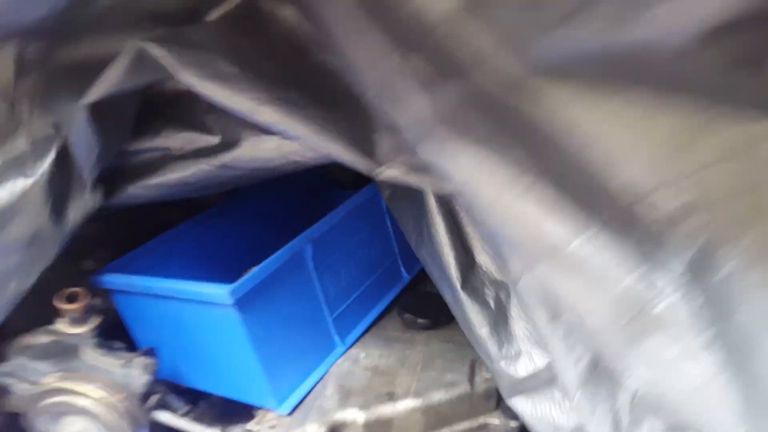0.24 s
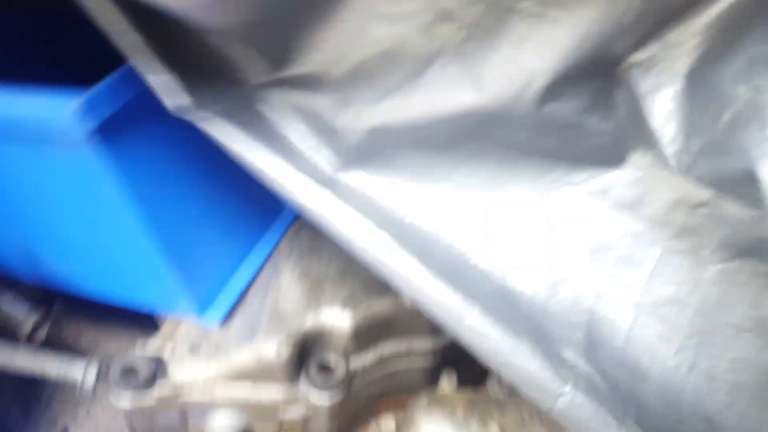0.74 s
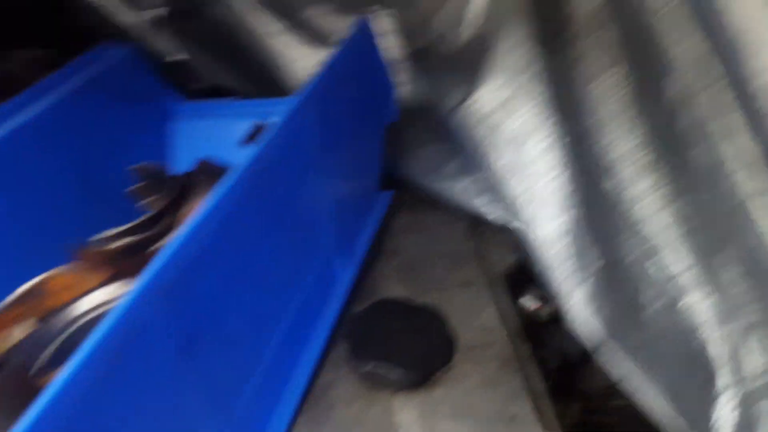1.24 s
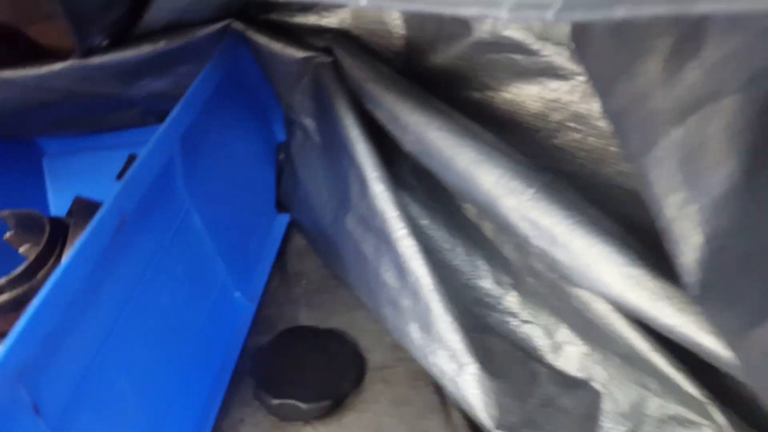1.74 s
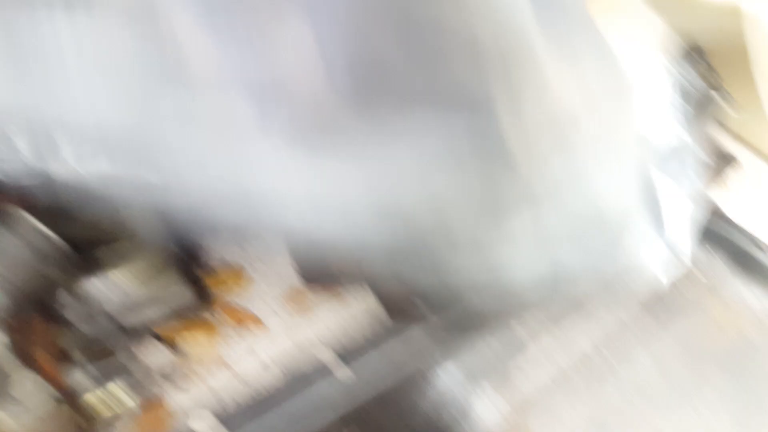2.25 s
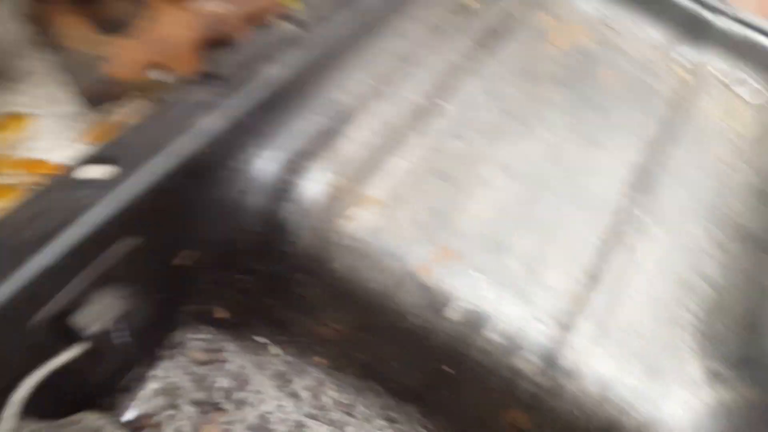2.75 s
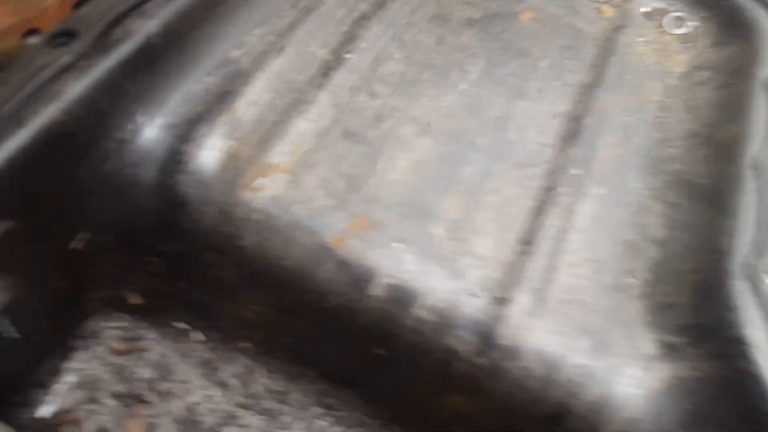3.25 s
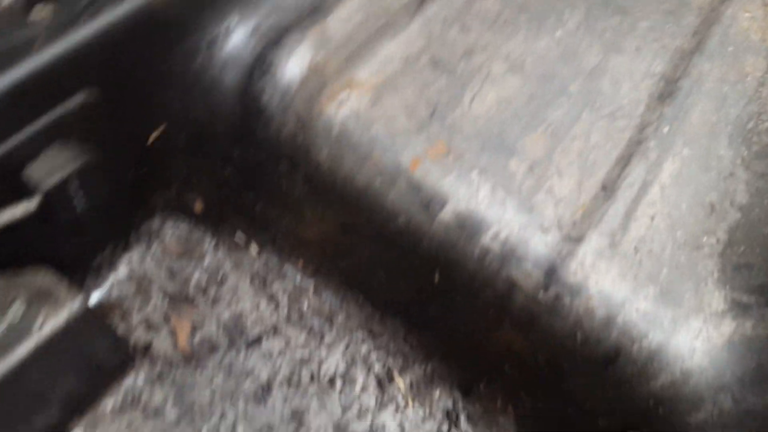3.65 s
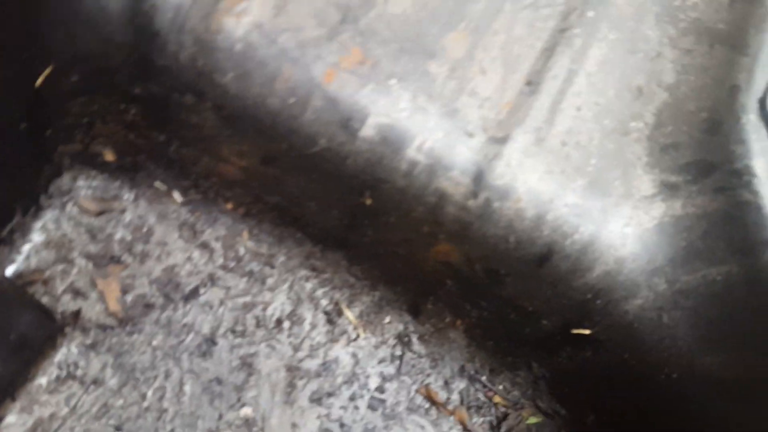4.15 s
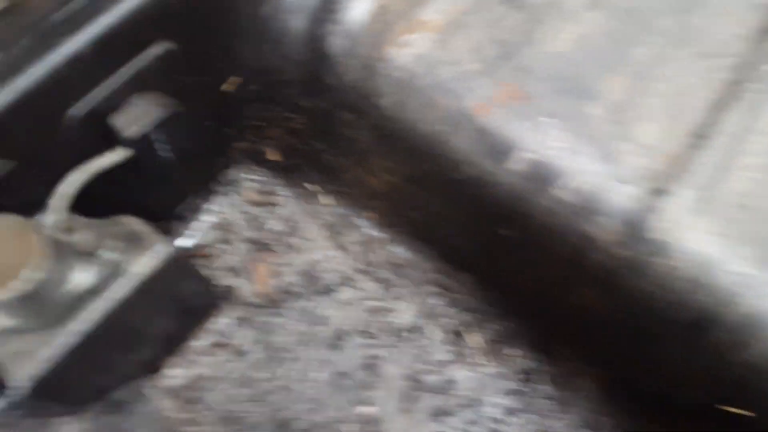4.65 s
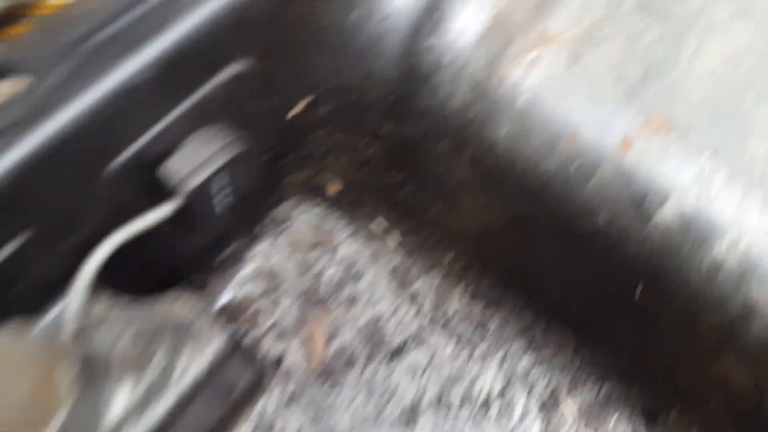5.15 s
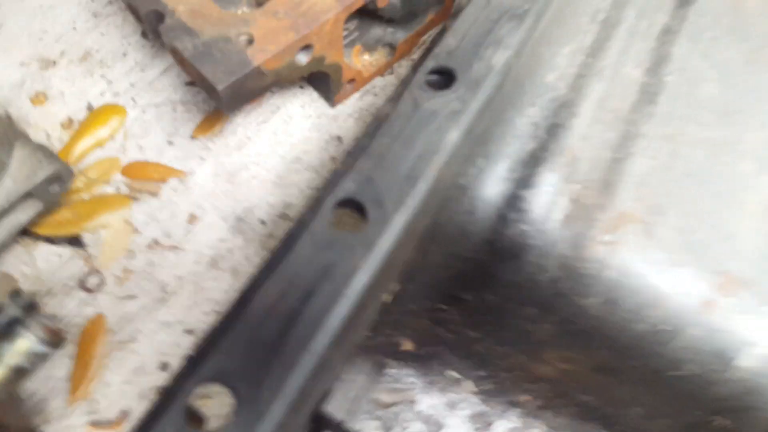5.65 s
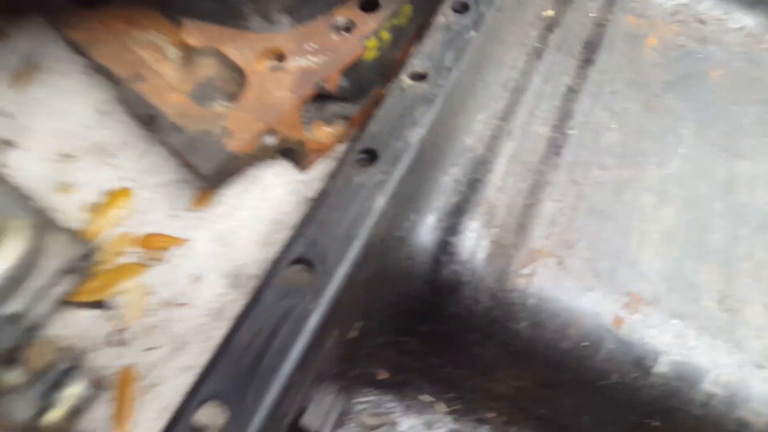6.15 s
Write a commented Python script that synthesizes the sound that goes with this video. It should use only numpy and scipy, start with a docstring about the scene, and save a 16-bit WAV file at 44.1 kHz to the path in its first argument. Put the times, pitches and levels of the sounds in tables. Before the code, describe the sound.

A stiff woven plastic tarp is pulled about in many quick tugs, very close to two microphones. Each tug is a dense burst of crackling folds and sliding rustle, with sharp creases snapping over and a low puff of air. A few slack folds flop with a dull hollow thump, the strongest a little after five seconds. Brief near-quiet gaps separate pulls. The room tail is short, and the right side is brighter.

```python
"""In a room with a short tail, a woven plastic tarp is dragged off a pile of engine parts in many short pulls,
close to a pair of microphones. Bursts of clicks ring resonant folds: the creases buckling. Filtered noise is the
sheet sliding on itself, and low noise the air it billows. Single creases snap over as three quick jumps through
a resonance, and a few times a slack fold flops with a hollow thump, a short decaying sine."""
import sys
import numpy as np
from scipy import signal
from scipy.fft import rfft, irfft, next_fast_len
from scipy.io import wavfile

SR = 44100
rng = np.random.default_rng(int(sys.argv[2]) if len(sys.argv) > 2 else 0)


def master_out(mix):
    """Clip the mix to full scale and print it as 16-bit PCM to the path in sys.argv[1]."""
    frames = np.transpose(np.atleast_2d(mix))
    ceiling = np.clip(frames, -1, 1)
    pcm = np.round(ceiling * 32767).astype(np.int16)
    wavfile.write(sys.argv[1], SR, pcm)


N = 281799

# Large creases snapping over.
# Each row: start in seconds, rms level of the first 6 ms in dB, pitch in Hz, decay time (T60) of the sheet in seconds.
LARGE_SNAPS = [(0.1764, -34, 4960, 0.097), (0.2356, -23, 700, 0.0096), (0.2605, -23, 2480, 0.018),
               (0.2799, -17.5, 1380, 0.015), (0.323, -24, 3200, 0.073), (0.3775, -23, 3490, 0.034),
               (0.4453, -19.5, 1260, 0.024), (0.5957, -30, 4530, 0.017), (0.7138, -17, 1690, 0.012),
               (0.829, -18.5, 2240, 0.03), (1.373, -19, 1590, 0.17), (1.9866, -23.5, 1920, 0.039),
               (2.1157, -31, 1120, 0.051), (2.199, -32, 1450, 0.036), (2.2966, -25, 1330, 0.028),
               (2.3167, -23.5, 3250, 0.03), (2.3406, -20, 2680, 0.011), (2.4451, -23.5, 1830, 0.027),
               (2.511, -29, 1300, 0.041), (2.7006, -20.5, 1900, 0.18), (2.9046, -21, 2480, 0.024),
               (3.1758, -25.5, 2240, 0.052), (3.2336, -29, 1080, 0.11), (3.4849, -43, 720, 0.083),
               (3.5936, -42, 1530, 0.076), (3.685, -20, 1050, 0.024), (3.7052, -21, 2280, 0.088),
               (3.9202, -18.5, 960, 0.013), (3.9979, -19.5, 2000, 0.029), (4.0951, -20.5, 980, 0.015),
               (4.176, -22.5, 3870, 0.02), (4.2228, -21.5, 2120, 0.031), (4.2746, -23, 2350, 0.047),
               (4.51, -25.5, 3270, 0.039), (4.5447, -32, 1930, 0.051), (4.63, -38, 1460, 0.083),
               (4.7262, -19.5, 2800, 0.052), (5.261, -20.5, 2340, 0.022), (6.3202, -30.5, 3770, 0.015)]
# The pulls of the hands.
# Each row: start in seconds, length in seconds, level of the broad folds at mid-pull in dB, swell from start to
# end in dB, then, relative to the folds: small creases in dB, sizzle of the weave in dB, billowing air in dB.
HAND_PULLS = [(-.02, 0.091, -41.5, 6, 3, -7, -7.5), (.148, 0.056, -32, -1, -4, -13, 4.5),
              (.215, 0.33, -25, 2.5, -3, -22, -8.5), (.565, 0.21, -23.5, 2.5, 0.5, -18.5, -7),
              (.82, 0.23, -20.5, 3.5, -1, -21.5, -7.5), (1.064, .12, -21.5, -7.5, -1, -21, -10),
              (1.169, 0.18, -21, -11.5, -1.5, -19, -8), (1.35, 0.34, -21, 3.5, -1.5, -22, -8),
              (1.605, 0.094, -20.5, 6.5, -15.5, -34, -28), (1.798, 0.21, -30, 4, -3, -15.5, -10.5),
              (2.09, .14, -40, 2, -1, -15.5, 3), (2.283, 0.068, -20.5, -23, -2.5, -23, -7),
              (2.339, 0.22, -31, -5.5, -1.5, -16, -5.5), (2.541, 0.22, -26.5, -2, -3, -19.5, -3),
              (2.83, 0.11, -30.5, -3, -1.5, -19, -6), (2.952, 0.15, -23.5, 3, -2, -18.5, -11),
              (3.16, 0.21, -38.5, -12, -3, -22, -8), (3.549, .07, -32.5, 16, -0.5, -11.5, -3.5),
              (3.668, .26, -24.5, 0, 2, -15, -5), (3.932, 0.34, -26.5, -2.5, -3.5, -22.5, -6),
              (4.285, .16, -37, 5, 1.5, -13.5, -2), (4.46, 0.086, -36.5, -8, -4.5, -24, -5),
              (4.628, .12, -27, 6.5, 1.5, -12.5, -1), (4.75, 0.15, -28, -5, -0.5, -13.5, -7.5),
              (4.92, 0.24, -29, 0.5, -1, -18.5, -6.5), (5.139, 0.44, -23.5, -4.5, 0, -21, -8),
              (5.601, .2, -26, 8.5, 1, -19, -6), (5.859, .17, -25.5, 12.5, 0.5, -17, -7.5),
              (6.114, .2, -34, 1, -2.5, -19, -8)]
RIGHT_LATE_S, MIC_SPACING_S = 0.00042, 0.00037  # lag of the right for sound from the left; travel between the mics


def from_db(db):
    """Decibels to gain."""
    return 10 ** (np.asarray(db) / 20)


def rms_one(x):
    """Scale so that the mean of the channels has rms 1."""
    return x / np.sqrt(np.mean(np.atleast_2d(x).mean(0) ** 2) + 1e-20)


def in_time(rows):
    """The columns of a curve at every sample."""
    s, *columns = np.transpose(rows)
    return [np.interp(np.arange(N) / SR, s, c) for c in columns]


def add(out, s, sound):
    """Mix a sound in at time s."""
    start = max(round(s * SR), 0)
    out[:, start:start + sound.shape[-1]] += sound[..., :max(N - start, 0)]


def drift(rate_hz):
    """Slow random drift of rms 1: noise through a double low-pass, worked out every 20 samples."""
    r = np.exp(-40 * np.pi * rate_hz / SR)
    noise = rng.standard_normal(N // 20 + 2002)
    slow = signal.lfilter([1], [1, -2 * r, r * r], noise)[2000:]  # drop the filter's run-in
    return np.interp(np.arange(N) / 20, np.arange(len(slow)), rms_one(slow))


def coloured(x, spectrum):
    """Minimum-phase filter through (Hz, dB) points: nothing sounds early."""
    size = 2 * next_fast_len(x.shape[-1] // 2 + SR // 20, real=True)
    hz, db = np.transpose(spectrum)
    log_f = np.log(np.fft.rfftfreq(size, 1 / SR) + 1)
    log_gain = np.log(from_db(np.interp(log_f, np.log(hz), db)))
    cepstrum = irfft(log_gain)[:size // 2]
    cepstrum[1:] *= 2  # fold the cepstrum onto positive time
    return irfft(rfft(x, size) * np.exp(rfft(cepstrum, size)))[..., :x.shape[-1]]


def stereo_noise(size, direct):
    """White noise at two spaced mics: a direct share of the treble comes from the left, the rest from all around."""
    padded = 2 * next_fast_len(size // 2 + 1)
    f = np.fft.rfftfreq(padded, 1 / SR)
    direct = np.clip(direct, 0, .95) * f / (f + 1000)
    from_left = direct * np.exp(-2j * np.pi * f * RIGHT_LATE_S)
    all_around = (1 - direct) * np.sinc(2 * f * MIC_SPACING_S)
    alike = from_left + all_around
    left, other = rfft(rng.standard_normal((2, padded)))
    right = alike * left + np.sqrt(np.maximum(1 - abs(alike) ** 2, 0)) * other
    return irfft([left, right])[:, :size]


def pulled(colour_db, release_db_per_s, rest_db):
    """Level of one layer in dB: every pull takes up the slack, swells or eases, and dies away when the hand stops."""
    attack_s = 0.055
    t = np.arange(0, N, 40) / SR
    power = from_db(2 * rest_db)
    for (start, length, level_db, swell_db, *_), own_db in zip(HAND_PULLS, colour_db):
        since = t - start
        held_db = level_db + own_db + swell_db * (np.clip(since / length, 0, 1) - .5)
        fallen_db = release_db_per_s * np.maximum(since - length, 0)
        gain = np.clip(since / attack_s, 0, 1) * from_db(held_db - fallen_db)
        power = power + gain ** 2
    return np.interp(np.arange(N) / SR, t, 10 * np.log10(power))


def buckling(effort_db, bursts):
    """Clicks of very unequal size; they come faster under a hard pull and in bursts."""
    hurry_db = 0.23 * (effort_db + 28.5)
    per_s = 1500 * from_db(hurry_db + 2.0 * bursts)
    sizes = from_db(4.0 * np.minimum(rng.exponential(1, N), 3.8)) * rng.choice([-1, 1], N)
    happens = rng.random(N) < per_s / SR
    return sizes * happens * from_db(-hurry_db / 2)  # under a harder pull each is smaller


def dying(power, t60):
    """Energy lingers and dies away; its sum is kept."""
    keep = from_db(-120 / (t60 * SR))  # power falls by 60 dB in t60
    return signal.lfilter([1 - keep], [1, -keep], power + 1e-18)


def fold(clicks, noise, hz, width, sheet_db, sheet_t60):
    """Clicks and their scatter through sheet and room, shaped by the resonance of one fold."""
    room_t60_s, room_db = .22, -7
    power = clicks ** 2
    in_sheet = from_db(2 * sheet_db) * dying(power, sheet_t60)
    in_room = from_db(2 * room_db) * dying(power, room_t60_s)
    sound = noise * np.sqrt(in_sheet + in_room)
    # broad folds lie ahead, small creases to the left
    leftward = min(hz / 2300, 1) * (1 + .2 * rng.standard_normal())
    sound += [clicks, np.roll(clicks, round(leftward * RIGHT_LATE_S * SR))]
    r, w = np.exp(-np.pi * width * hz / SR), 2 * np.pi * hz / SR  # width: bandwidth over pitch
    return signal.lfilter((1 - r * r) / 2 * np.array([1, 0, -1]), [1, -2 * r * np.cos(w), r * r], sound)


def crinkle(clicks, sliding, spectrum, slide_db, width, sheet_db, count):
    """Clicks dealt to folds that tighten and slacken, over the hiss of the sheet sliding on itself; rms 1."""
    # The fold that rings most, as the free part of the sheet changes size.
    # Each row: time in seconds, pitch in Hz.
    main_fold = [(0, 515), (2.0, 445), (2.5, 650), (3.1, 550), (3.7, 810), (4.3, 890), (4.9, 784),
                 (6.39, 580)]
    main_fold_db, sheet_t60_s = 4, .035
    dealt, scatter, rings = rng.integers(0, count, N), stereo_noise(N, direct=0.23), 0
    main_hz, = in_time(main_fold)
    for k, hz in enumerate(np.geomspace(spectrum[1][0], spectrum[-2][0], count)):
        near_main = np.exp(-10 * np.log2(hz / main_hz) ** 2)
        taut = from_db(3.0 * drift(26) + main_fold_db * near_main)
        own_clicks = clicks * taut * (dealt == k)
        own_scatter = np.roll(scatter, k * SR // 10, axis=1)  # a different stretch of noise for each fold
        rings = rings + fold(own_clicks, own_scatter, hz, width, sheet_db, sheet_t60_s)
    ringing = rms_one(coloured(rings, spectrum))
    hiss = rms_one(coloured(sliding, spectrum))
    return rms_one(ringing + from_db(slide_db) * hiss)


def rustle(folds_db, creases_db, weave_db):
    """The same buckles sound in broad folds, small creases and the weave."""
    # Tone of each of the three as it reaches the microphones; the weave dips deeply near 9.6 kHz. Each row:
    # frequency in Hz, filter gain in dB.
    fold_tone = [(160, -43.5), (300, -1), (398, -5), (477, 0), (527, -1.5), (646, -0.5), (898, -1),
                 (1090, -3.5), (1500, -4), (1950, -90), (3300, -120)]
    crease_tone = [(880, -13), (1500, -1), (2910, -3.5), (3790, -8), (5140, -11.5), (7000, -21.5),
                   (9100, -50), (15400, -120)]
    weave_tone = [(4100, -18.5), (7000, -3), (8200, -6.5), (9600, -17.5), (12400, -8), (15000, -17),
                  (17000, -19)]
    bursts = drift(70)
    clicks = buckling(creases_db, bursts)
    sliding = stereo_noise(N, direct=0.054) * from_db(0.1 * bursts)
    # slide_db: sliding hiss against buckling; the added dB trims each layer
    folds = crinkle(clicks, sliding, fold_tone, slide_db=-7, width=0.17, sheet_db=1.0, count=11)
    folds = from_db(folds_db - 0.5) * folds
    creases = crinkle(clicks, sliding, crease_tone, slide_db=-5, width=0.58, sheet_db=6.0, count=7)
    creases = from_db(creases_db - 0.5) * creases
    weave = crinkle(clicks, sliding, weave_tone, slide_db=-4, width=.7, sheet_db=4, count=2)
    weave = from_db(weave_db + 0.5) * weave
    return folds + creases + weave


def billow(level_db):
    """The moving sheet pushes lumps of air; slack folds flop with a short hollow note."""
    # Tone of the moving air. Each row: frequency in Hz, filter gain in dB.
    air_tone = [(8, -70), (25, -43), (50, -11.5), (92, -2.5), (193, -1.5), (280, -5.5), (400, -14.5),
                (800, -40), (2000, -100)]
    # Slack folds flopping.
    # Each row: start in seconds, level in dB before soft start and decay, pitch in Hz, decay time (T60) in seconds.
    thumps = [(0.988, -10, 180, 0.078), (2.768, -12, 249, 0.094), (2.814, -19.5, 186, 0.11),
              (4.731, -22, 191, 0.061), (5.215, -2, 209, 0.055), (5.251, -4, 208, 0.043)]
    unshared = 0.2 * rng.standard_normal((2, N))  # a little noise of its own on each side
    air = coloured(stereo_noise(N, direct=0.68) + unshared, air_tone)
    out = from_db(level_db + 1) * rms_one(air * from_db(drift(8.6)))
    t = np.arange(SR // 4) / SR
    for s, start_db, hz, t60 in thumps:
        soft_start = 1 - np.exp(-2 * hz * t)
        add(out, s, from_db(start_db - 60 * t / t60) * soft_start * np.sin(2 * np.pi * hz * t))
    return out


def stalling():
    """The sheet stalls as tension builds against a large crease: the rustle hushes until it gives way."""
    stall_db, stall_s = 2, .018
    hush, size = np.zeros((1, N)), round(stall_s * SR)
    for s, *_ in LARGE_SNAPS:
        add(hush, s - stall_s, np.linspace(0, 1, size) ** .5)
    return from_db(-stall_db * hush[0])


def snaps(rows):
    """Creases flip over at their own pitch: a crack runs along the crease in three quick jumps."""
    # Tone of a crack as it reaches the microphones, with a deep dip near 9.7 kHz. Each row: frequency in Hz,
    # filter gain in dB.
    snap_tone = [(100, -29), (400, 16), (1000, 9), (3000, 0.5), (5000, -1), (8000, -9), (9700, -22),
                 (12500, -9), (16000, -14)]
    out, size, attack = np.zeros((2, N)), SR // 6, SR // 166
    for s, level_db, hz, t60 in rows:
        jumps = np.zeros(size)
        jumps[[0, *rng.integers(10, attack // 2, 2)]] = 1, -.7, .5
        scatter = stereo_noise(size, direct=0.055)
        crack = coloured(fold(jumps, scatter, hz, width=0.7, sheet_db=5.0, sheet_t60=t60), snap_tone)
        add(out, s, from_db(level_db) * crack / crack.mean(0)[:attack].std())
    return out


def lesser_snaps(creases_db, count):
    """Snaps at chance moments and pitches, about as loud as the small creases around them."""
    over_db, middle_hz, t60_s = 0.5, 2000, 0.057
    rows = []
    for when, size, pitch in rng.random((count, 3)):
        level_db = creases_db[int(when * N)] + over_db + 6 * (size - .5)
        hz = middle_hz * 2 ** (2 * pitch - 1)  # within an octave either way
        rows.append((when * N / SR, level_db, hz, t60_s))
    return rows


def scene():
    """The tarp is all that sounds; the pulls drive rustle, air and lesser snaps."""
    creases, weave, air = np.transpose(HAND_PULLS)[4:]
    # the sheet never lies quite still (rest_db); the air settles more slowly
    folds_db = pulled(np.zeros(len(HAND_PULLS)), release_db_per_s=198, rest_db=-52)
    creases_db = pulled(creases, release_db_per_s=198, rest_db=-57)
    weave_db = pulled(weave, release_db_per_s=198, rest_db=-71.5)
    air_db = pulled(air, release_db_per_s=99, rest_db=-46)
    sheet = rustle(folds_db, creases_db, weave_db) * stalling() + billow(air_db)
    return sheet + snaps(LARGE_SNAPS) + snaps(lesser_snaps(creases_db, count=36))


def record(dry):
    """The left microphone is duller than the right; peaks are rounded, the top is cut."""
    # Left minus right, shared half to each side. Each row: frequency in Hz, difference in dB.
    left_right = [(60, 1.5), (110, -0.5), (200, 0.5), (380, 0.5), (700, 0.5), (1290, -2.5), (2380, -4),
                  (4400, -6.5), (8120, -8), (15000, -10.5)]
    cutoff_hz = 15950
    heard = []
    for x, side in zip(dry, (1, -1)):
        heard.append(coloured(x, [(hz, side * db / 2) for hz, db in left_right]))
    rounded = 1.4 * np.tanh(np.array(heard) / 1.4)
    return signal.sosfilt(signal.ellip(10, .2, 80, cutoff_hz, fs=SR, output="sos"), rounded)


dry = scene()
out = record(dry)
master_out(out)
```